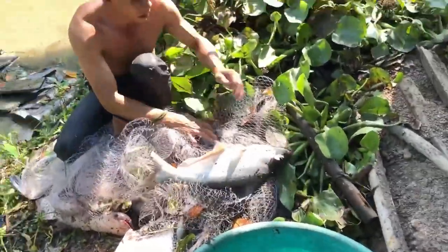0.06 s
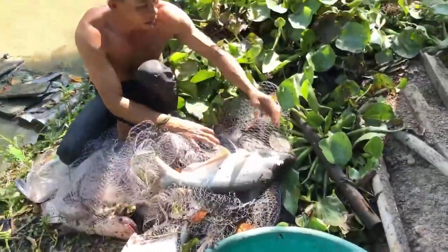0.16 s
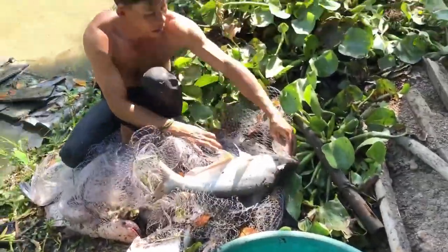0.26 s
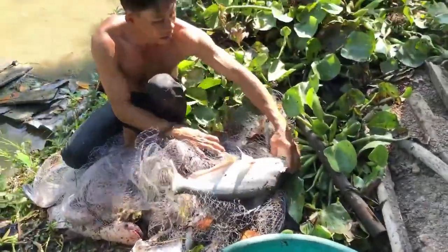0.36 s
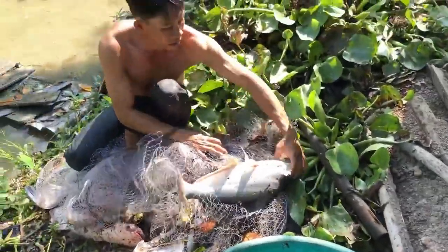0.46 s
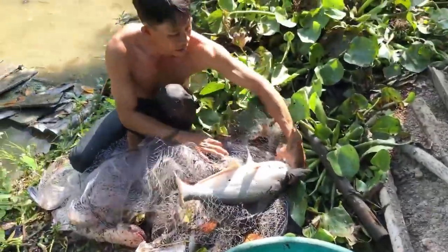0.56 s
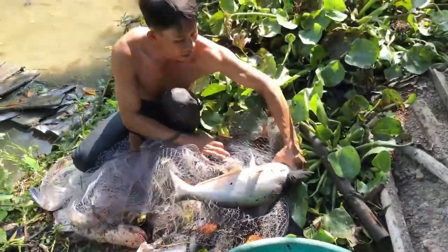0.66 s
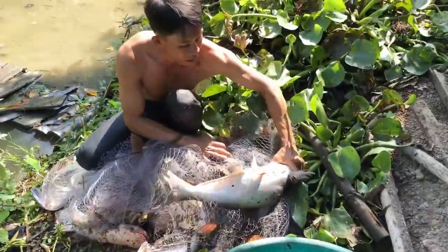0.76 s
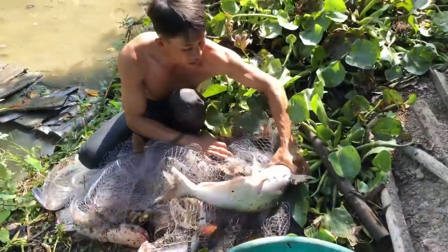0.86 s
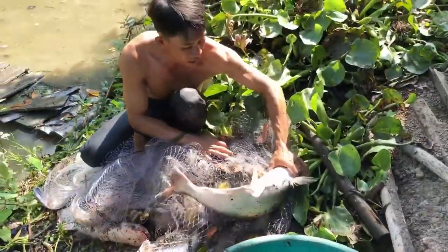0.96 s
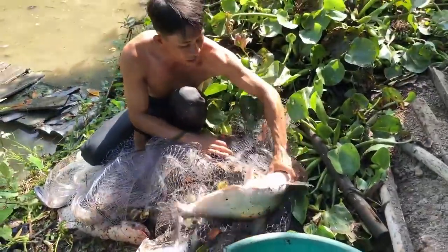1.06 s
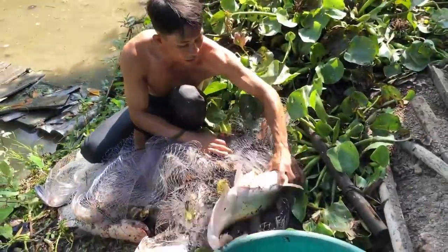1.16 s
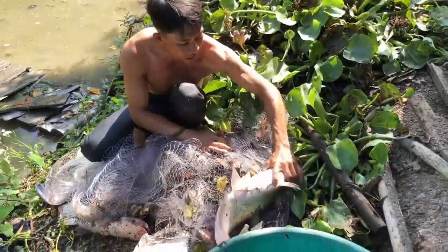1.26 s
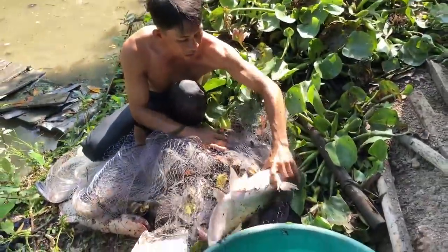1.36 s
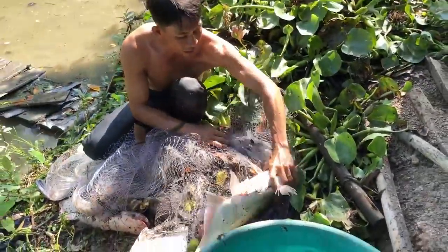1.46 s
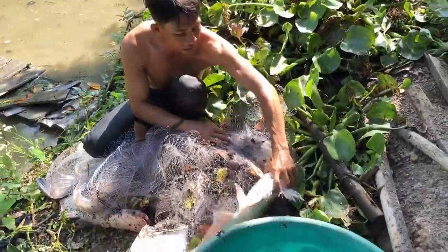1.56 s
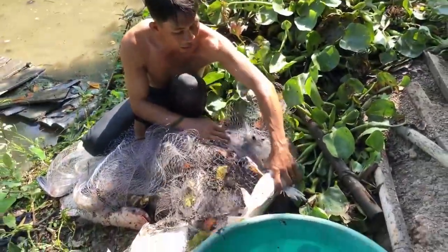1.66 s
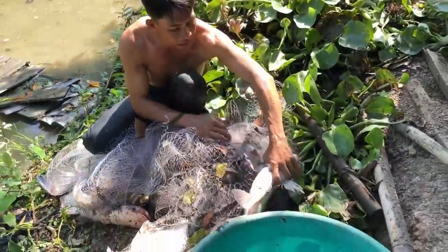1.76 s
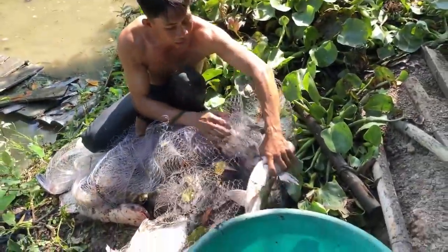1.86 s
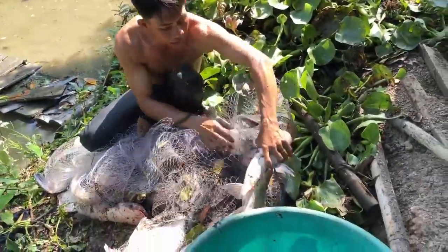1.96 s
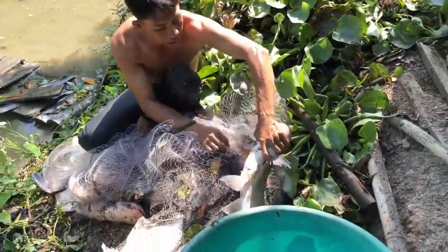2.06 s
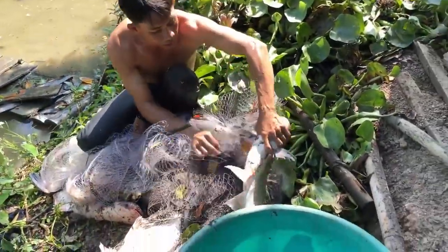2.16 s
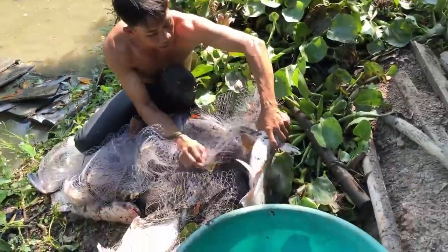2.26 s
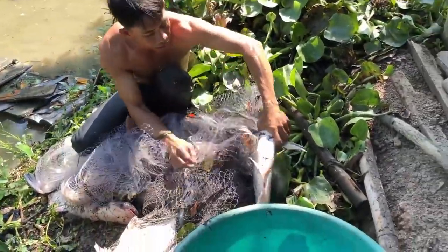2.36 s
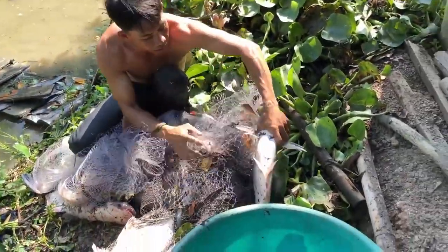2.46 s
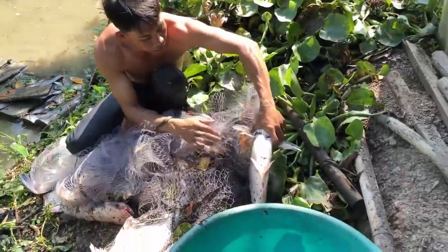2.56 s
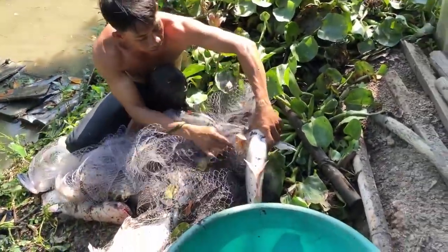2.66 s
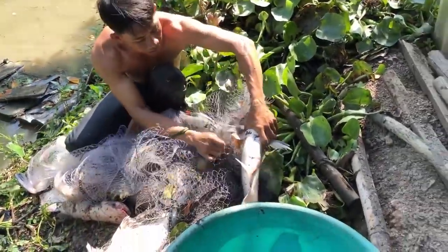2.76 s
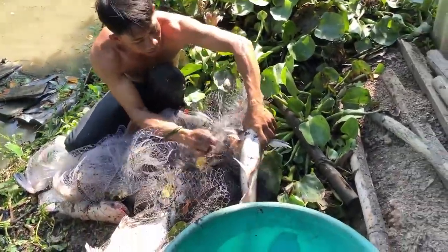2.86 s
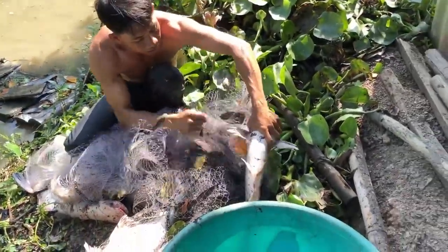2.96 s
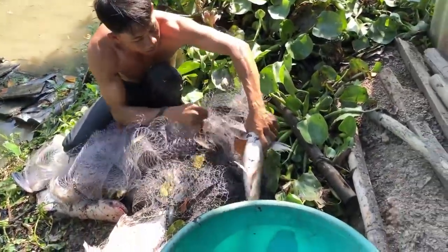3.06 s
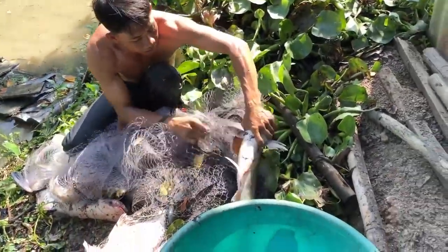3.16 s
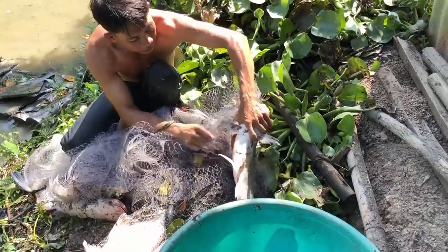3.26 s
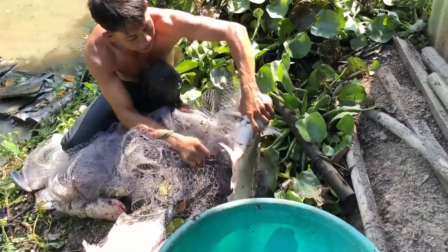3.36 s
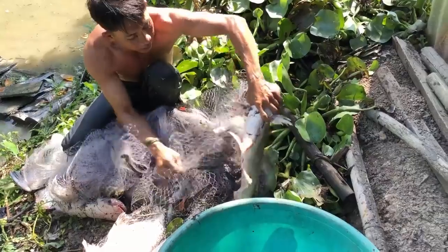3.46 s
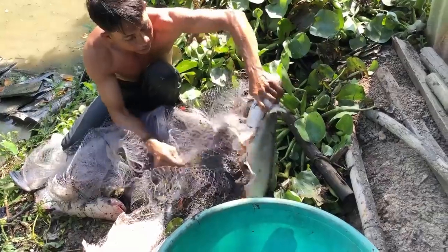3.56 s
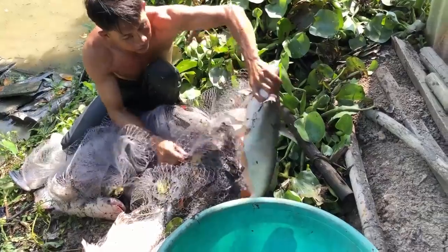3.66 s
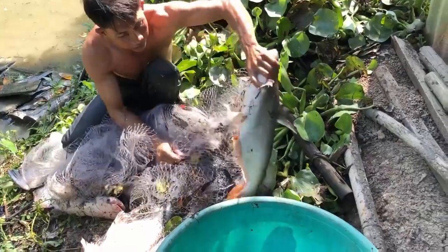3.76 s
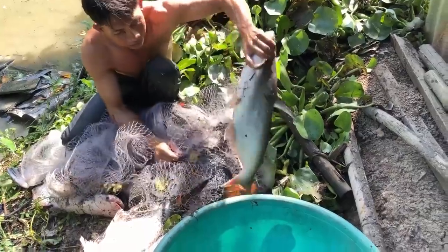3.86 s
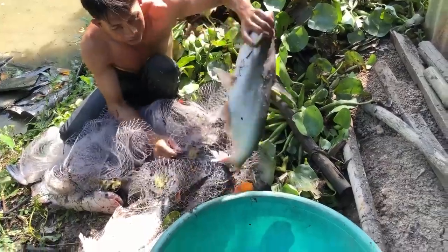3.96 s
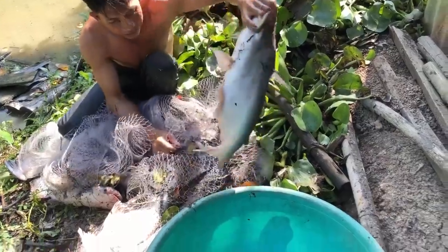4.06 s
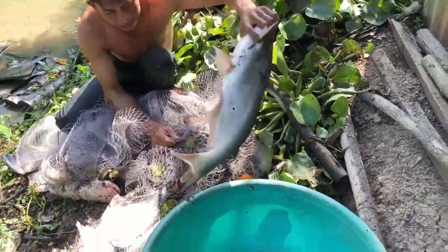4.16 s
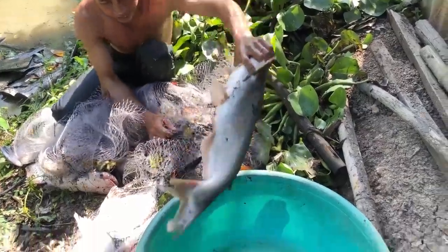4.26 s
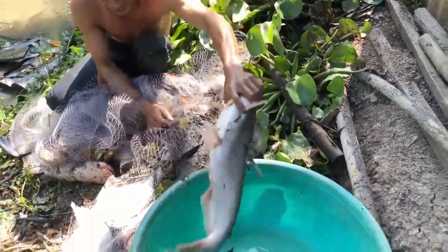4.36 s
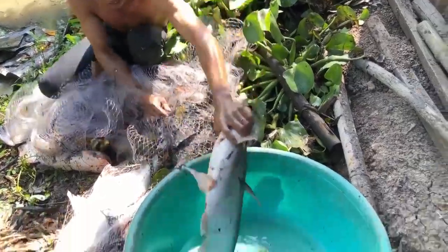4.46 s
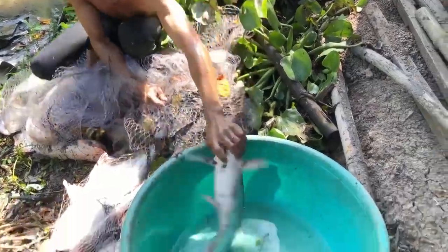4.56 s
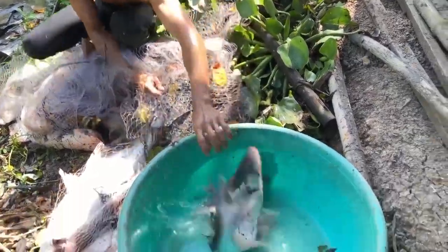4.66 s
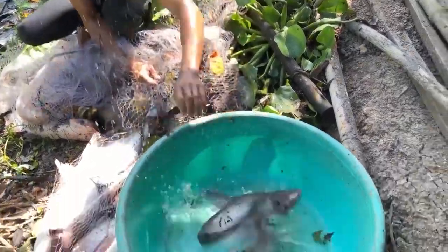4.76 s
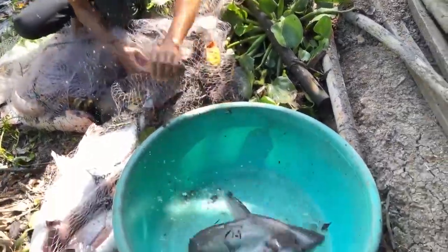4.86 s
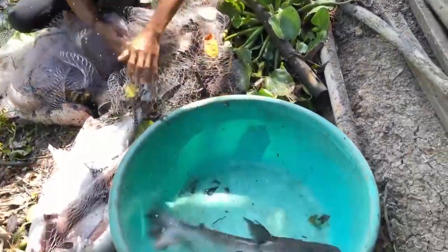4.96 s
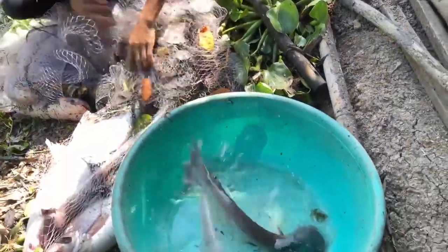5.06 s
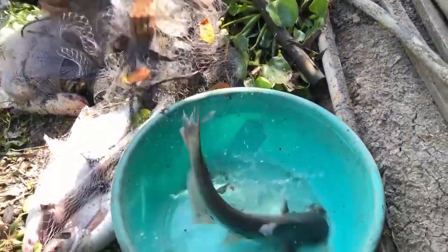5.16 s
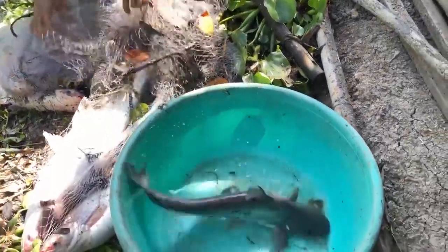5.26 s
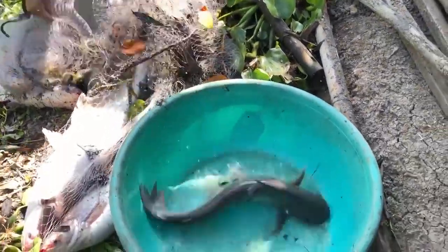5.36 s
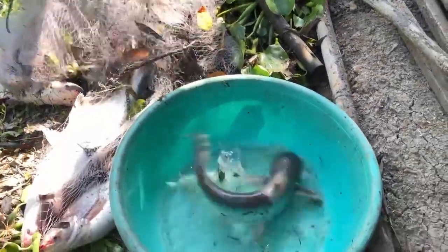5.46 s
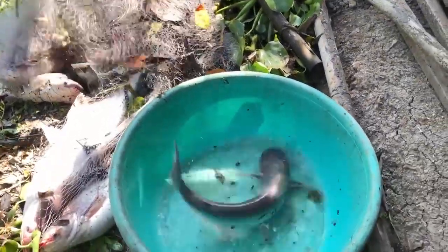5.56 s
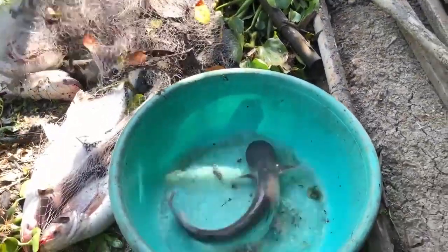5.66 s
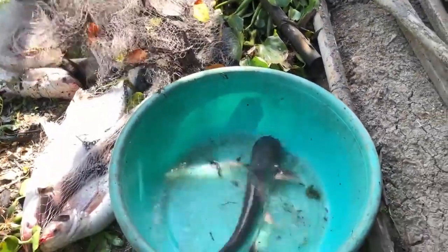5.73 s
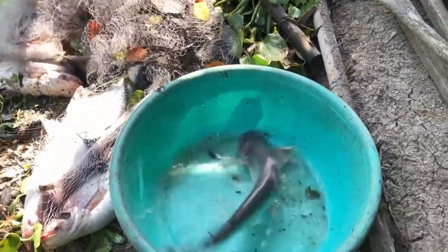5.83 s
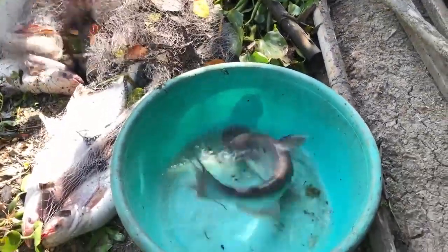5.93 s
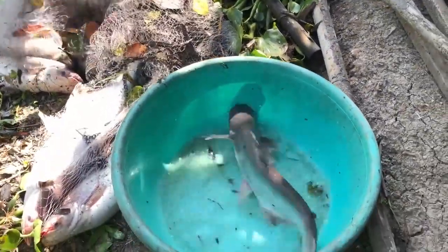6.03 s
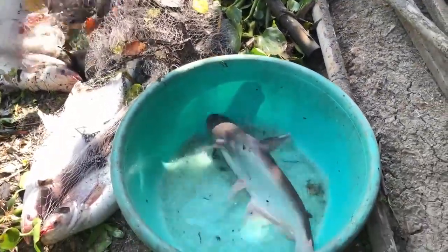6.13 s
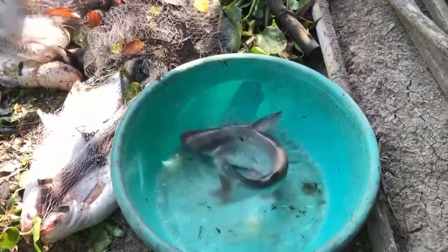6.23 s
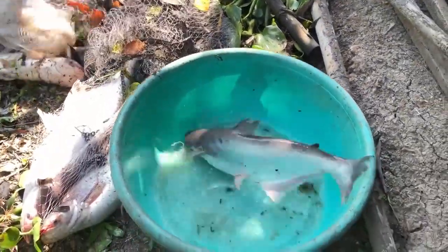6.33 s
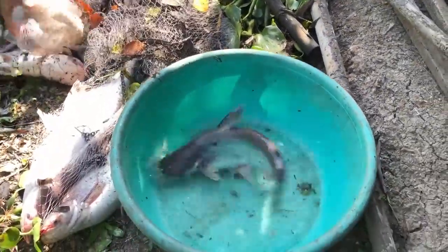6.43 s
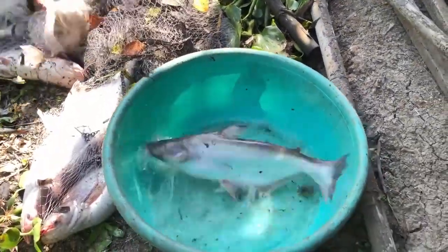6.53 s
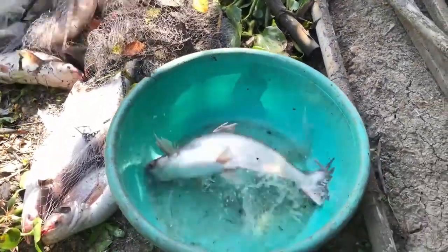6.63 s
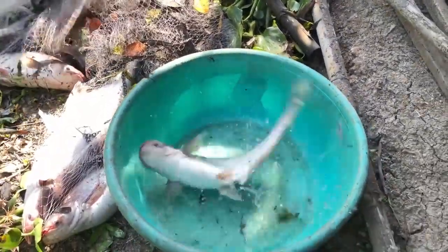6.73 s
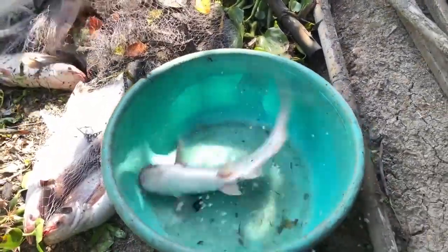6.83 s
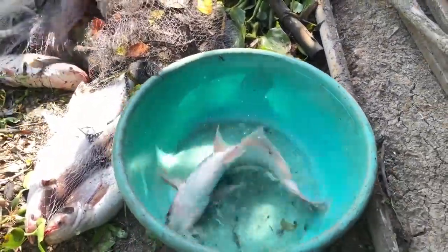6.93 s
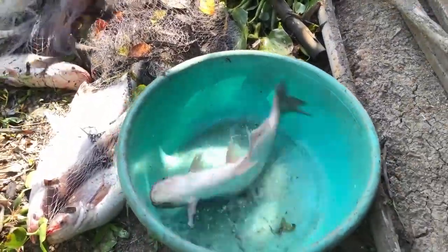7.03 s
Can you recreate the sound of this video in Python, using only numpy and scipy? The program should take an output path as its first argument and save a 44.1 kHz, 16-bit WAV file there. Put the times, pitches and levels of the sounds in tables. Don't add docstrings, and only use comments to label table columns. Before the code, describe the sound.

A slow engine putters faster across a pond while hands rustle a net; suddenly a fish plops into a plastic tub, slapping and thumping wetly.

```python
import sys
import numpy as np
from scipy import signal
from scipy.fft import rfft, irfft
from scipy.io import wavfile
from scipy.ndimage import uniform_filter1d

SR = 44100
rng = np.random.default_rng(int(sys.argv[2]) if len(sys.argv) > 2 else 0)


def materialize(psi):
    bounded = np.clip(np.atleast_2d(psi).T, -1, 1)
    quanta = np.round(bounded * 32767).astype(np.int16)
    wavfile.write(sys.argv[1], SR, quanta)


def invert_db(x):
    u = np.asarray(x, float) / 20
    return 10 ** u


N = 312669
T = np.arange(N) / SR


def unit(x):
    return x / np.sqrt(np.mean(x ** 2))


def add(out, start_s, x):
    i = max(int(start_s * SR), 0)
    out[i:i + len(x)] += x[:max(N - i, 0)]


def band(x, lo_hz, hi_hz):
    sos = signal.butter(2, [lo_hz, min(hi_hz, .45 * SR)], "band", fs=SR, output="sos")
    return signal.sosfilt(sos, x)


def colour(x, table):
    hz, db = np.transpose(table)
    f = np.arange(N // 2 + 1) * SR / N + 1
    gain = invert_db(np.interp(np.log(f), np.log(hz), db))
    return unit(irfft(rfft(x) * gain, N))


def ring(x, hz, t60):
    pole = np.exp(2j * np.pi * hz / SR - np.log(1000) / (t60 * SR))
    return signal.lfilter([0, pole.imag], [1, -2 * pole.real, abs(pole) ** 2], x)


def curves(table):
    start_s, *columns = np.transpose(table)
    return [invert_db(np.interp(T, start_s, db, left=-120)) for db in columns]


def swells(peak_s, db, rise_s, fall_s):
    t = T[::32]
    rise_s, fall_s = np.maximum(rise_s, .003), np.maximum(fall_s, .003)
    power = 0
    for at, level, rise, fall in zip(peak_s, db, rise_s, fall_s):
        power = power + invert_db(2 * level - 20 * np.maximum((at - t) / rise, (t - at) / fall))
    return np.interp(T, t, np.sqrt(power))


def strokes(table):
    start_s, *columns, length_s = np.transpose(table)
    return [swells(start_s, db, 0.99 * length_s, length_s) for db in columns]


def walk(rate):
    k = int(SR / rate)
    held = np.repeat(rng.standard_normal(N // k + 1), k)
    return 1.65 * uniform_filter1d(held, k)[:N]


def crackle(rate, scatter_db, tail_ms):
    chance = rng.random((N, 2))
    sizes = invert_db(-scatter_db * np.log(chance[:, 1] + 1e-4))
    starts = (chance[:, 0] < rate / SR) * sizes
    puffs = signal.lfilter([1], [1, -np.exp(-1000 / (tail_ms * SR))], starts)
    return unit(puffs * rng.standard_normal(N))


def bubble(hz, cycles, glide):
    turns = np.arange(int(5 * cycles * SR / hz)) * hz / SR
    swell = 1 - np.exp(-turns / 0.45)
    decay = np.exp(-turns / cycles - (turns / cycles / 2) ** 2)
    return np.sin(2 * np.pi * turns * (1 + glide * turns / cycles)) * swell * decay


def hits(table, q, ring_db, width_db, spatter_db):
    out, t = np.zeros(N), np.arange(3000) / SR
    for start_s, db, hz, ms, hiss_db in table:
        u = t * 1000 / max(ms, .5)
        shape = (1 - np.exp(-u / .15)) * (np.exp(-(u / 1.4) ** 4) + .15 * np.exp(-u / 2.5))
        ring_noise, hiss_noise, wide_noise = rng.standard_normal((3, len(t)))
        tone = band(ring(ring_noise * shape, hz, q / hz), hz / 2, hz * 2)
        wide = band(band(wide_noise * shape, hz / 1.3, hz * 1.55), hz / 2, hz * 1.8)
        hiss = band(hiss_noise, 1570, 20200) * u * np.exp(-u / 0.87)
        for part, part_db in ((tone, ring_db), (wide, width_db), (hiss, hiss_db)):
            add(out, start_s - .001, invert_db(db + part_db) * part / np.abs(part).max())
        for late, pitch, life in rng.random((6, 3)):
            drop = bubble(min(hz, 3500) * 2 ** (1.5 * pitch - .3), 2.2 + 2.8 * life, 0.093)
            add(out, start_s + 0.0051 + 0.047 * late, invert_db(db + spatter_db - 14.0 * late) * drop)
    return out


# pitch_hz, density_db (per Hz)
AIR_COLOUR = [(18, -43), (30, 6.5), (64, 4), (486, -13.5), (760, -13), (1190, -18), (3400, -31),
              (10800, -94), (14800, -67), (16000, -41)]


def air():
    hum = unit(band(rng.standard_normal(N), 49.0, 59.8))
    hum *= invert_db(-49.5 - 0.82 * T + walk(2.8))
    return invert_db(-47.5) * colour(rng.standard_normal(N), AIR_COLOUR) + hum


# start_s, firing_rate_hz
ENGINE_SPEED = [(0, 10.451), (0.8, 10.245), (1.3, 9.842), (1.6, 10.345), (2.3, 12.33), (3.1, 14.136),
                (3.5, 14.111), (4.1, 15.02), (4.7, 15.372), (5.3, 15.741), (5.9, 15.109), (7.1, 15.005)]
# start_s, blast_db, ring_db
ENGINE_LOAD = [(0, -69, -8), (.6, -49.5, -15), (1.37, -44.5, -22), (1.5, -39, -8), (1.8, -37.5, -4),
               (2.67, -37.5, -0.5), (3.3, -47.5, 9), (4.05, -43, 5.5), (4.4, -46, 8), (4.9, -41.5, 5.5),
               (5.4, -40.5, 0.5), (7.09, -35, -1.5)]
# pitch_hz, level_db, t60_s, lag_ms
EXHAUST_MODES = [(70.5, -16, 0.12, -4), (100.6, 2, 0.079, -3), (109.2, -13.5, 0.51, 2),
                 (129.4, -10, 0.4, -5.5), (151.3, -4, 0.11, -7), (250.5, -12.5, 0.21, 4.5),
                 (282.2, -15, 0.15, 3.5), (232.5, -3.5, 0.042, -2), (309, -16, 0.073, 7.5)]


def engine():
    speed = np.interp(T, *np.transpose(ENGINE_SPEED))
    fired = 4.07 + np.cumsum(speed) / SR
    times = np.interp(np.arange(5, 99), fired, T)
    rate = np.interp(times, T, speed)
    load_s, *columns = np.transpose(ENGINE_LOAD)
    blast_db, low_db = (np.interp(times, load_s, c) for c in columns)
    high_db = low_db - 1
    sharpness = 0.38 + 0.041 * (rate - 12)
    size = invert_db(blast_db + 0.69 * rng.standard_normal(len(times)))
    heat = (rate / 13.05) ** 0.6
    t, after, out = np.arange(-400, 400) / SR, np.arange(9000) / SR, np.zeros(N)
    for when, a, sharp, lift, low, high in zip(times, size, sharpness, heat, low_db, high_db):
        u = t / (.0022 - 0.00078 * np.clip(sharp, 0, 1))
        blast = invert_db(8.5) * (1 - u ** 2) * np.exp(-u ** 2 / 2)
        add(out, when + t[0], a * blast)
        bark = np.cos(2 * np.pi * 223 * lift * t) * np.exp(-(t * 1000 / 4.5) ** 2)
        add(out, when + t[0], a * invert_db(high - 1) * np.clip(when - 3.2, .2, 1) * bark)
        for hz, db, t60, lag_ms in EXHAUST_MODES:
            fade = (1 - np.exp(-after / 0.00033)) * np.exp(-np.log(1000) * after / t60)
            gain = a * invert_db(db + 8.5 + (low if hz < 190 else high))
            add(out, when + lag_ms / 1000, gain * fade * np.sin(2 * np.pi * hz * lift * after))
    dip_hz = 197.5
    sos = signal.butter(1, [dip_hz / 1.15, dip_hz * 1.15], "band", fs=SR, output="sos")
    under_way = np.clip((T - 3.5) / .6, 0, 1)
    out = out - 0.53 * under_way * signal.sosfiltfilt(sos, out)
    dull = signal.sosfiltfilt(signal.butter(4, 285, fs=SR, output="sos"), out)
    clear = signal.sosfiltfilt(signal.butter(4, 360, fs=SR, output="sos"), out)
    return dull + under_way * (clear - dull)


# start_s, rustle_db
NET_RUSTLE = [(0, -51), (.2, -55.5), (.75, -51), (1, -52), (1.95, -52), (2.32, -49), (2.5, -49),
              (2.7, -45.5), (3.12, -49), (3.32, -46.5), (3.55, -47.5), (3.85, -48), (3.93, -44.5),
              (4.4, -49.5)]
# pitch_hz, density_db (per Hz)
RUSTLE_COLOUR = [(240, -38), (400, -36.5), (516, -6.5), (618, -9), (1640, -6), (2180, -7), (3480, -5.5),
                 (14500, -14)]
# start_s, scrape_db, length_s
NET_DRAGS = [
    (.14, -51.5, 0.048),
    (1, -41.5, 0.018),
    (1.17, -42.5, 0.045),
    (1.29, -46.5, 0.042),
    (1.59, -48.5, 0.18),
    (2.62, -48, 0.18),
    (3.3, -50, 0.33),
    (3.75, -60, 0.066),
    (4.01, -48.5, 0.47),
]
# start_s, peak_db, ring_hz, length_ms, hiss_db
SINKERS = [(0.477, -42, 1900, 3.6, 11), (1.023, -30, 1410, 2.5, -10), (1.051, -29, 1430, 1.5, -6),
           (1.077, -30, 1450, 1.7, -8), (1.285, -33, 1030, 6.3, -25), (1.877, -37.5, 5500, 18, -25),
           (2.077, -41, 2270, 2.7, 5), (2.13, -39, 1660, 2.6, -16), (2.254, -42.5, 2050, 29, 7),
           (2.279, -35, 5100, 4.8, -2), (2.732, -38.5, 1880, 2, 12), (2.954, -22.5, 9300, 4.3, -24),
           (3.001, -33, 1410, 4.3, -0.5), (3.06, -34.5, 1580, 2.6, 6), (3.449, -34, 1730, 2.7, -16),
           (3.476, -28.5, 1450, 3.8, -3), (3.506, -27.5, 1690, 5, 2), (3.699, -34.5, 3480, 5.5, 5.5),
           (3.762, -33.5, 890, 5.2, -17), (3.9, -35.5, 2340, 9.9, 4), (1.024, -37, 4200, 2.4, -20),
           (1.052, -40, 816, 4.4, -30), (1.053, -31.5, 3150, 2.2, -15), (1.079, -35, 4000, 3.1, -20),
           (.954, -41, 3000, 4, -15), (1.105, -42, 1500, 3, -6), (1.136, -41, 1600, 3.8, 5),
           (1.268, -40, 3620, 8.1, 2), (3.507, -33, 3500, 3.5, -20), (2.65, -38, 990, 8.1, 3),
           (2.848, -37, 2880, 5.8, -12), (2.897, -37.5, 1880, 5.5, 4), (3.286, -37, 3000, 2.7, -5),
           (3.476, -33, 4060, 3, -20)]
# start_s, peak_db, pitch_hz, life_cycles
ROPE_CREAKS = [
    (3.92, -47, 516, 67),
    (4.38, -52, 540, 120),
    (4.43, -50, 796, 110),
]


def net():
    (rustle,), (scrape,) = curves(NET_RUSTLE), strokes(NET_DRAGS)
    fade = np.clip((4.75 - T) / 0.071, .3, 1)
    threads = colour(rng.standard_normal(N) + 0.42 * crackle(250, 2.3, 1.), RUSTLE_COLOUR)
    threads *= invert_db(.7 * walk(45))
    heap = unit(band(crackle(500, 1.5, 12), 145, 1440))
    knots = hits(SINKERS, q=18, ring_db=-8, width_db=-6, spatter_db=-60)
    for start_s, db, hz, ms, _ in SINKERS:
        add(knots, start_s, invert_db(db + 0.5) * bubble(hz, max(hz * ms / 2000, 1), .01))
    rope = np.zeros(N)
    for start_s, db, hz, cycles in ROPE_CREAKS:
        add(rope, start_s, invert_db(db) * bubble(hz, cycles, 0.0044))
    rope *= invert_db(1.5 * walk(70) - 1.0)
    handling = invert_db(0.5) * rustle * threads + invert_db(-2.0) * scrape * heap
    return rope + fade * handling + knots


# peak_s, peak_db, rise_s, fall_s
THREAD_SQUEAKS = [(.16, -57, .06, .03), (.33, -49, .012, 0.0099), (.52, -49, 0.044, 0.076),
                  (1.27, -54, .1, .04), (1.71, -55, 0.091, 0.037), (1.99, -53, .01, 0.076),
                  (2.31, -55, .07, .07), (3.12, -46, .015, 0.07), (3.47, -53, .012, 0.27),
                  (2.9, -66, .6, .3), (4.88, -60, 0.25, .3), (5.26, -47, .15, .4), (5.63, -36.5, 0.2, 0.44),
                  (6.27, -36, 0.18, 0.21), (6.5, -50, .1, .15), (6.8, -40, .25, .12)]


def squeak():
    level = swells(*np.transpose(THREAD_SQUEAKS))
    slips = band(band(crackle(2500, 1.2, 1.), 15000, 16400), 14000, 16800)
    return level * invert_db(3.0 + walk(60)) * unit(band(slips, 14800, 15500))


# start_s, peak_db, contact_ms
BODY_THUMPS = [(5.12, -18.5, 6.1), (5.175, -25, 1.9), (5.538, -18, 2.4), (6.085, -14.5, 4.3),
               (6.4023, -12, 2), (6.407, -8, 3.54), (6.417, -10, 4.9), (6.459, -13.5, 6.5),
               (6.615, -23.5, 1.1), (6.719, -12.5, 4.7), (6.948, -17.5, 3.6)]
# pitch_hz, level_db, t60_s
WALL_MODES = [(74.4, -32, 0.31), (117, -11.5, 0.069), (153, -15, 0.064), (236, -16.5, 0.1),
              (306, -22.5, 0.094), (417, -18, 0.16), (660, -41, .05), (880, -35, .04)]


def wall():
    push, t = np.zeros(N), np.arange(800) / SR
    for start_s, db, ms in BODY_THUMPS:
        blow = np.sin(np.pi * np.minimum(t * 1000 / max(ms, .3), 1)) ** 2
        add(push, start_s, invert_db(db + 10.5) * blow / blow.sum())
    return sum(invert_db(db) * ring(push, hz, t60) for hz, db, t60 in WALL_MODES)


# start_s, peak_db, pitch_hz, life_cycles
AIR_GULPS = [
    (4.688, -11, 405, 1.5),
    (4.749, -12, 385, 1.7),
    (5.205, -20, 416, 6),
    (5.526, -10, 573, 1.7),
    (6.148, -19, 413, 4.1),
    (6.41, -14.5, 618, 7.4),
    (6.445, -20, 437, 4.9),
    (6.695, -21, 407, 4.6),
]
# start_s, peak_db, pitch_hz, life_cycles
AIR_PLINKS = [(4.654, -24, 2110, 8.3), (4.768, -8.5, 887, 13), (4.6865, -18, 2700, 8),
              (4.687, -18.5, 5230, 12), (4.693, -23, 3850, 13), (4.711, -21, 2300, 6),
              (4.7535, -19, 2280, 14), (4.777, -12.5, 1680, 8.1), (4.7975, -1, 2350, 5.4),
              (4.848, -14, 1220, 1.7), (4.907, -27, 1800, 5), (5.017, -22, 1800, 6),
              (5.053, -16, 2770, 6.4), (5.054, -18, 1930, 8), (5.068, -21.5, 436, 3.9),
              (5.088, -19, 750, 3.8), (5.107, -14, 1120, 5), (5.11, -14, 760, 3.1), (5.164, -18, 430, 4.1),
              (5.4905, -14, 1670, 6), (5.492, -15, 2130, 6.1), (5.503, -14, 2460, 7),
              (5.503, -18.5, 1020, 5), (5.571, -22, 2120, 8.9), (5.644, -22, 1800, 5),
              (5.6645, -27, 2570, 6.6), (5.742, -32, 1300, 6.4), (5.752, -26.5, 700, 3.7),
              (6.0355, -9, 1130, 3.7), (6.051, -17, 890, 8), (6.097, -22, 2800, 8), (6.121, -20.5, 3300, 9),
              (6.29, -22.5, 1200, 7.3), (6.368, -26, 1310, 8), (6.43, -15, 890, 5.4),
              (6.453, -14.5, 642, 5), (6.549, -16.5, 4300, 9), (6.636, 0.5, 2480, 6), (6.637, 1, 1650, 5.8),
              (6.6388, -1, 2800, 3.2), (7.0798, -8.5, 1150, 4), (7.0783, -9.5, 1880, 3.7),
              (7.041, -11.5, 700, 2.3), (4.7513, 1.5, 403, 1.37), (6.7137, -0.5, 1520, 1.8),
              (6.7615, -20.5, 2430, 5.2), (6.788, -23, 1005, 8.1)]


def gulps():
    out = np.zeros(N)
    for start_s, db, hz, cycles in AIR_GULPS:
        add(out, start_s, invert_db(db) * bubble(hz, cycles, 0.18 / cycles))
    for start_s, db, hz, cycles in AIR_PLINKS:
        add(out, start_s, invert_db(db) * bubble(hz, cycles, .01))
    return out


# start_s, peak_db, ring_hz, length_ms
FIN_RAPS = [(4.6557, -20.5, 830, 1.2), (4.7495, -5.5, 696, 6), (4.8485, -19, 1040, 5.3),
            (4.8555, -12, 3700, 4.4), (5.017, -16.5, 3100, 5.7), (5.112, 2.5, 2800, 3.5),
            (5.246, -13, 3340, 3.5), (5.2668, -18, 3340, 3.8), (5.3188, 0.5, 7200, 1.2),
            (5.444, -11, 2840, 1.8), (6.044, -10, 1340, 8.6), (6.084, -10, 1020, 6.2),
            (6.4526, -6.5, 980, 1.6), (6.479, -4, 1100, 7.7), (6.549, -17.5, 4030, 5.1),
            (6.637, -3.5, 1850, 3.6), (6.714, -10, 1560, 2.3), (7.047, -16, 640, 4.2)]
# start_s, peak_db, ring_hz, length_ms
TAIL_SLAPS = [(4.753, -17, 2200, 5.3), (4.7978, -4, 2500, 1.6), (4.873, -23, 5200, 1.9),
              (5.1034, -3.5, 2030, 6.7), (5.6643, -8.5, 3580, 3.1), (5.8177, -2, 3000, 2.1),
              (5.852, -17, 3080, 13), (6.0353, -12, 1190, 4.6), (6.4005, -11, 1160, 13),
              (6.7609, -20, 2380, 3.7), (6.9475, -5, 1660, 2.7), (7.0788, -11, 2580, 3.3)]
# start_s, peak_db, ring_hz, length_ms
SPRAY_FLICKS = [(4.6858, -13.5, 2650, 7.1), (4.769, -12, 2900, 8.9), (5.0529, -12.5, 1070, 2.5),
                (5.342, -18, 3900, 3.9), (5.61, -20, 1080, 5.8), (5.7068, -21.5, 1510, 2.8),
                (5.7996, -22, 2430, 3), (5.8826, -18, 7100, 8.8), (5.9396, -34, 940, 2),
                (6.2396, -18.5, 1630, 3.9), (6.6864, -6, 2600, 3.7), (6.851, -19, 819, 2.6),
                (6.891, -10.5, 1260, 5.4), (6.988, -11, 780, 5.2)]
# start_s, peak_db, ring_hz, length_ms,
# hiss_db
KNOCKS_AND_POPS = [(1.029, -31, 236, 11, -40), (1.078, -31.5, 245, 12, -40), (1.155, -35, 600, 14, -20),
                   (1.283, -27.5, 1770, 3.1, -32), (2.954, -26.5, 5240, 5.7, -24),
                   (2.956, -21, 1400, 0.47, -34), (4.767, -11, 880, 15, -13), (4.94, -18.5, 920, 25, -13),
                   (5.817, -13, 1200, 5.6, -27), (5.826, -9, 2680, 2.6, -18), (6.6373, -6, 2350, 0.79, -39),
                   (6.662, -12, 1470, 9.8, -16),
                   (4.7496, -19, 3200, 1.5, 3), (4.621, -24.5, 1890, 6, -15), (6.9482, -5.5, 3280, 0.83, -3),
              (6.7137, -8.5, 3220, 1.9, -3), (4.8002, -4.5, 4270, 3, -2), (5.29, -12, 1270, 3.8, -16),
              (5.526, -13.5, 940, 4.4, -30), (6.0356, -7, 1140, 1.4, -25), (6.938, -13, 880, 5.6, -10),
              (7.008, -11, 910, 4.9, -22), (4.92, -25, 5750, 2, -15), (4.997, -18, 5760, 2.6, -20),
              (5.048, -15, 9100, .8, -5), (5.092, -28, 2500, 4.6, -1), (5.31, -19, 6000, 2.8, 0),
              (5.459, -14, 3400, 2.9, -25), (5.483, -12, 2830, 3.3, -25), (5.4896, -7, 11000, 1.7, -16),
              (5.503, -13, 2390, 2.9, -25), (5.518, -14.5, 3500, 3.5, 1.5), (5.579, -25, 2200, 2.8, -10),
              (5.627, -15, 3860, 2.7, 5), (5.645, -22, 1710, 2, -15), (5.705, -13, 8600, 3.6, -21),
              (5.744, -25, 1200, 8, -30), (5.953, -13.5, 1100, 2.5, -17.5), (5.996, -13, 2200, 2.3, -25),
              (6.021, -19.5, 5640, 4.7, 5), (6.0492, -5, 1600, 1.3, -23), (6.055, -15, 1910, 5, -23),
              (6.1208, -12, 1640, 1.5, -5), (6.179, -18.5, 2580, 2.1, -10), (6.207, -17.5, 2900, 10, -7),
              (6.381, -23.5, 9300, 3.3, 5), (6.401, -13.5, 3500, 1.7, -1), (6.471, -10.5, 2620, 4.4, -11),
              (6.495, -30, 1300, 2.4, -6), (6.556, -22, 1380, 14, -28), (6.591, -29, 2190, 5, -12),
              (6.637, -3.5, 2360, 3, -35), (6.6375, -9, 3480, 3.4, -30), (6.692, -8, 800, 7, -10)]


def slaps():
    blows = []
    for table, hiss_db in ((FIN_RAPS, -28), (TAIL_SLAPS, -3.5), (SPRAY_FLICKS, 3.5)):
        blows += [(*row, hiss_db) for row in table]
    blows += KNOCKS_AND_POPS
    return hits(blows, q=12, ring_db=-3, width_db=-6, spatter_db=-17)


# start_s, level_db, length_s
BODY_SLIDES = [(4.77, -28.5, 0.05), (5.07, -37, 0.05), (5.16, -29, 0.053), (5.47, -37.5, 0.076),
               (5.64, -43.5, 0.091), (5.84, -40, 0.033), (6.08, -32.5, 0.081), (6.24, -49, 0.033),
               (6.45, -27, 0.034), (6.69, -33, 0.085), (7.02, -35, 0.12)]


def slide():
    (level,) = strokes(BODY_SLIDES)
    rub = crackle(300, 2, 4)
    groan = ring(rub, 428, .05) + invert_db(-4) * ring(rub, 663, .05) + invert_db(-4) * ring(rub, 890, .04)
    return level * unit(groan)


def drops(count, lo_hz, hi_hz, cycles, scatter_db):
    out = np.zeros(N)
    start_s, span_s = 4.5, 2.59
    for when, pitch, size, life, bend in rng.random((count, 5)):
        hz = lo_hz * (hi_hz / lo_hz) ** pitch
        turns = cycles * (0.12 + 1.7 * life ** 2) * (1 + 1.5 * pitch)
        drop = bubble(hz, turns, .1 * (2 * bend - 1))
        level = invert_db(3 * pitch - scatter_db * np.log(size + 0.011))
        add(out, start_s + when * span_s, drop * level)
    return out / np.std(out[int(start_s * SR):])


# start_s, splash_db, spray_db, length_s
TAIL_SWEEPS = [(4.62, -40, -53, 0.03), (4.7, -23, -26.5, 0.0097), (4.78, -30, -21.5, 0.063),
               (4.87, -55, -21, 0.018), (4.93, -35, -22.5, 0.02), (4.96, -33, -40, 0.09),
               (5.11, -17.5, -27, 0.038), (5.18, -35, -23, 0.1), (5.3, -35.5, -29, 0.24),
               (5.51, -29, -43, 0.17), (5.63, -28, -21, 0.087), (5.85, -30.5, -17.5, 0.023),
               (5.97, -33.5, -20.5, 0.071), (6.06, -25.5, -40, 0.054), (6.15, -36, -55, 0.26),
               (6.21, -31.5, -35, 0.054), (6.25, -31, -22, 0.049), (6.3, -35, -37, 0.047),
               (6.42, -25, -39, 0.032), (6.5, -29.5, -26, 0.041), (6.58, -41, -47, 0.048),
               (6.675, -23, -33, 0.068), (6.89, -33.5, -24.5, 0.26), (6.98, -29, -36, 0.042),
               (7.07, -29.5, -23, 0.099)]
# pitch_hz, density_db (per Hz)
SPLASH_COLOUR = [(290, -57), (500, 0.5), (878, -10), (1420, 0.5), (1660, -8), (1850, -7.5), (2490, -2),
                 (4970, -8.5), (14500, -11.5)]


def splashes():
    splash, spray = strokes(TAIL_SWEEPS)
    water = np.zeros(N)
    for hz in 250 * 2 ** np.arange(6):
        broken = crackle(900, 2.2, 2.5) + .35 * rng.standard_normal(N)
        water += unit(band(broken, hz, 2 * hz)) * np.sqrt(hz)
    water = colour(water, SPLASH_COLOUR) * invert_db(0.36 * walk(44))
    bubbles = drops(count=2800, lo_hz=696.0, hi_hz=7100, cycles=3.7, scatter_db=1.8)
    bubbles *= invert_db(1.3 * walk(45) - .3)
    mist = unit(band(crackle(800, 2.8, 1.) + .35 * rng.standard_normal(N), 4500, 16000))
    mist *= invert_db(1.6 * walk(46))
    return splash * (invert_db(-2.0) * water + invert_db(-3.0) * bubbles) + invert_db(-12.0) * spray * mist


def basin():
    near = wall() + gulps() + invert_db(4.5) * slide() + splashes() + invert_db(-3.0) * slaps()
    out = near.copy()
    add(out, .0051, invert_db(-19) * near)
    return out


def scene():
    out = air() + engine() + net() + squeak() + basin()
    return out[None]


def roll_off(x):
    return signal.sosfilt(signal.butter(12, 16830, fs=SR, output="sos"), x)


def record(dry):
    x = signal.sosfiltfilt(signal.butter(3, 52, "high", fs=SR, output="sos"), dry)
    x = signal.sosfilt(signal.ellip(12, .2, 56, 15700, fs=SR, output="sos"), x)
    soft_clip = .5
    mix = np.tanh(soft_clip * x) / soft_clip
    return roll_off(mix)


dry = scene()
out = record(dry)
materialize(out)
```